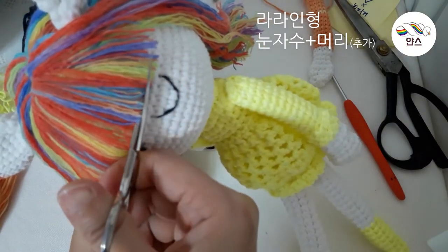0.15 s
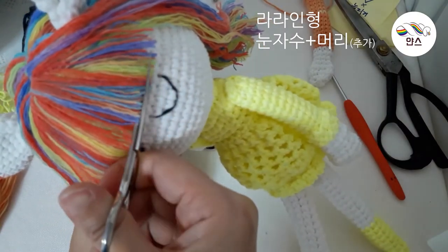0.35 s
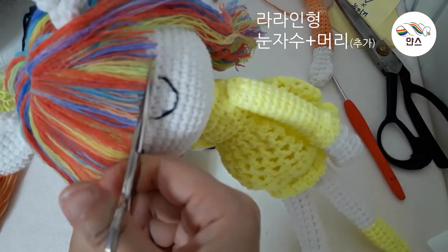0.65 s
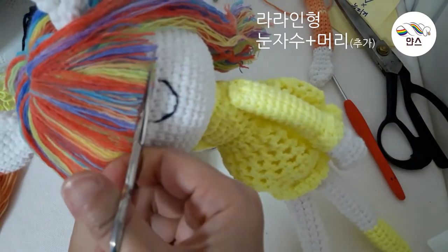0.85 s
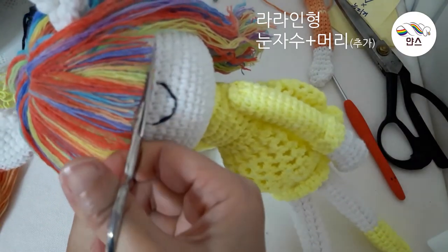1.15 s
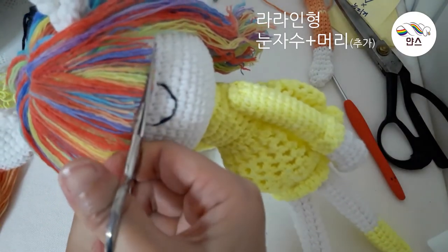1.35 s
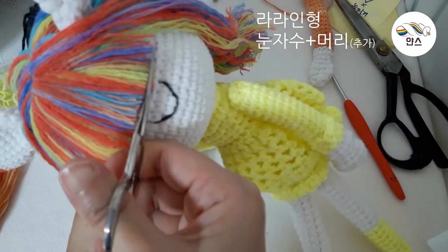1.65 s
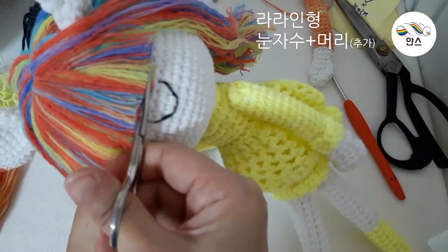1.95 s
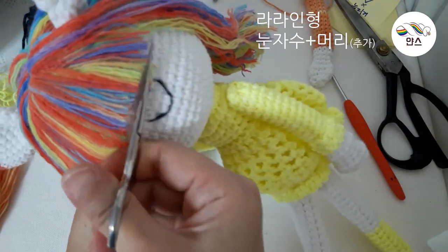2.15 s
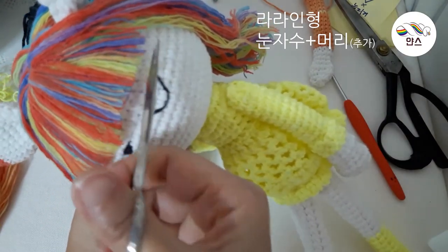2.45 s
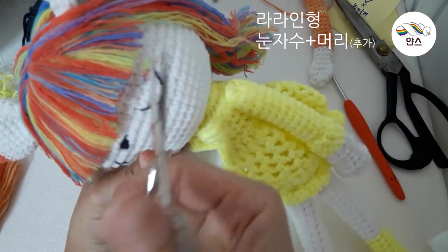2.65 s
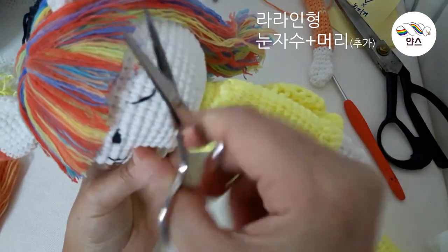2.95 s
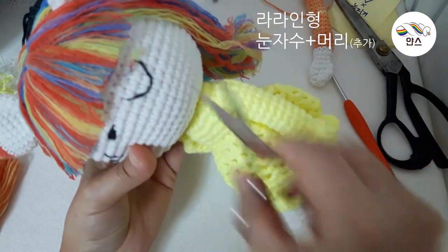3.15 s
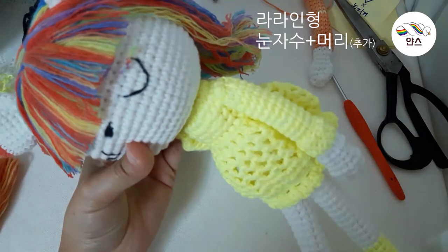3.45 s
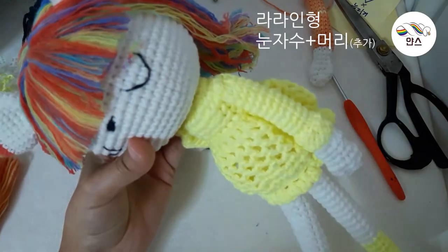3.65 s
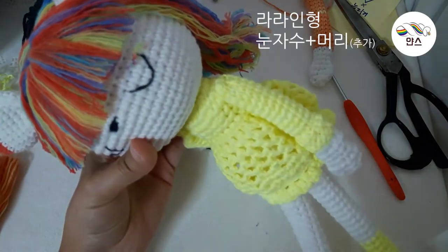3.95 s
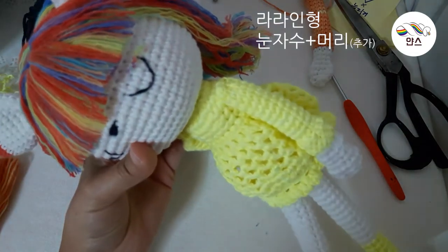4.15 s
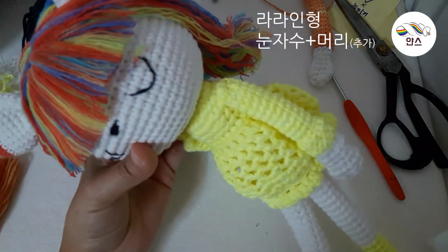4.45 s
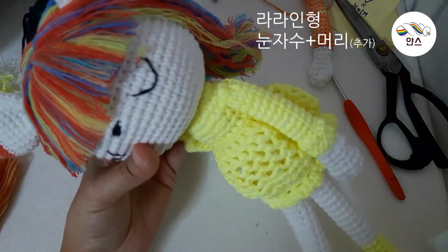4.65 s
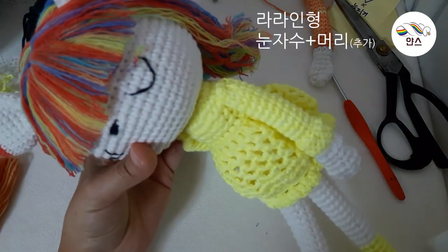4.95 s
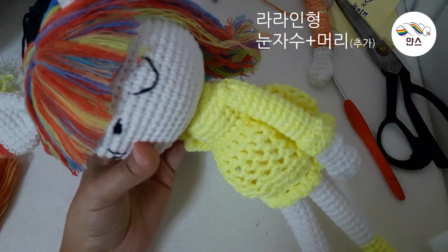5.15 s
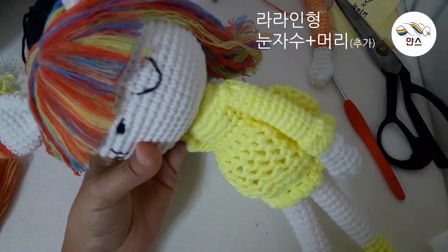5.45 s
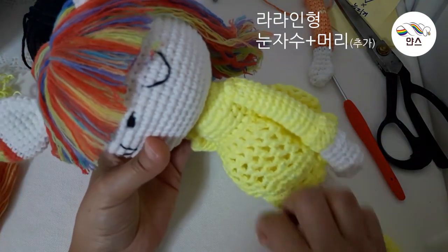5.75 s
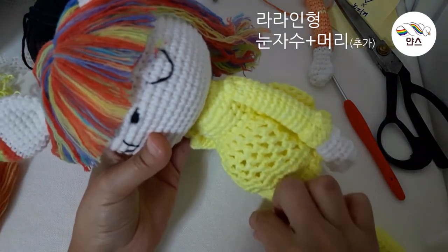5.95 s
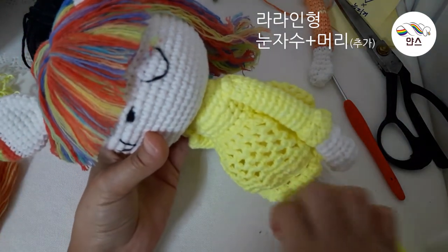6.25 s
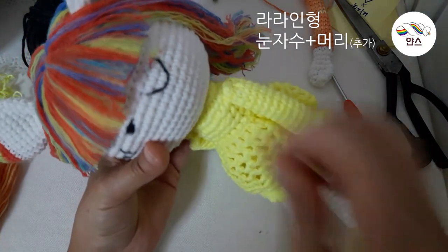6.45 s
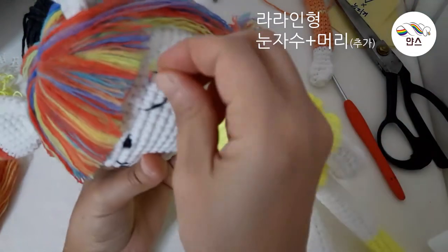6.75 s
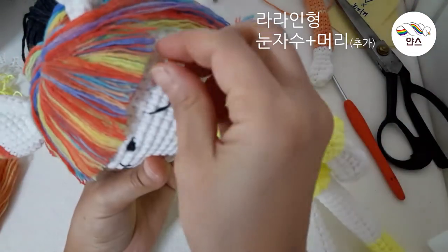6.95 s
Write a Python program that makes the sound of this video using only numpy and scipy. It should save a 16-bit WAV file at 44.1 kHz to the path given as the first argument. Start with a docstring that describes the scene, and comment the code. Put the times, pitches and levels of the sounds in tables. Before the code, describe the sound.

Two soft, crunchy scissor cuts through yarn, followed by a click, a brief steel clatter and light knocks on a table.

```python
"""Small steel scissors trim a doll's yarn fringe twice, close to the microphones in a quiet, droning room:
the blades rub, strands part in short crunches, the tips click shut. At 3.8 s the scissors are closed,
then fingers brush the doll's wool on and off. At 4.5 s the scissors touch down on a table, and a hand
bumps it. At 5.3 s they drop: the blades crack and ring, the top thuds. Near 6 s a hand taps the table
and judders along its edge."""
import sys
import numpy as np
from scipy import signal
from scipy.fft import rfft, irfft
from scipy.io import wavfile

SR = 44100
rng = np.random.default_rng(int(sys.argv[2]) if len(sys.argv) > 2 else 0)


def store_wav(level_fs):
    """Save 16-bit WAV to argv[1]."""
    pcm = np.round(np.clip(np.atleast_2d(level_fs), -1, 1) * 32767)
    wavfile.write(sys.argv[1], SR, pcm.T.astype(np.int16))


N = 313551
TIME_S = np.arange(N) / SR
AGE_S = TIME_S[:SR // 2]

# Room noise, its bass trim, its side channel. Each row: frequency in Hz, gain in dB.
AIR_COLOUR = [(15, -40), (25, -9), (59, -6.5), (107, -9), (133, -5), (160, -10.5), (188, -9), (221, -13.5),
              (433, -18.5), (631, -19), (703, -20), (1660, -24), (7300, -39), (8130, -43), (15500, -32)]
AIR_BASS_TRIM = [(30, -9.5), (45, -2), (78, -7.0), (110, -0.5)]
AIR_SIDE_COLOUR = [(30, -33.5), (70, -31), (150, -22), (300, -12.5), (700, -9), (1500, -7.5), (3000, -4.5),
                   (6000, -6), (14000, -4.5)]
# Room drones. Each row: centre in Hz, half width in Hz, level in dB.
ROOM_DRONES = [(45.9, 5.5, -71), (102.9, 4.58, -72.5), (164, 10, -74.5), (473.7, 6, -84.5)]
# Blades sliding over each other and the yarn. Each row: start in seconds, length in seconds, level in dB.
BLADE_STROKES = [(.04, 0.44, -64.5), (.84, 0.1, -77), (1.755, 0.1, -61), (2.12, 0.052, -66.5)]
# Strands parting. Each row: midpoint in seconds, level in dB.
STRAND_CUTS = [(.224, -54.5), (.291, -57), (.312, -51), (.325, -56), (.346, -51), (0.361, -48.5),
               (.371, -52), (.380, -45.5), (.414, -44), (.426, -54), (1.860, -41.5), (1.883, -43.5),
               (1.8892, -45)]
# Blades and pivot clicking, then a hand tapping the table (last two rows). Each row: start in seconds,
# snap level in dB, tilt in dB per octave, resonance in Hz, its level in dB, its t60 in seconds.
CLICKS_AND_TAPS = [(0.3088, -45, 0, 2460, -58, .01), (0.4519, -39, 2, 7700, -60, .018),
                   (.565, -57, -5, 1817, -52, 0.063), (1.9134, -31.5, -2, 2700, -36, 0.0068),
                   (3.7623, -29, 0.2, 7910, -47.5, .06), (4.9553, -49, -8.5, 4180, -54, .021),
                   (5.197, -56, -5, 3000, -71, .02), (5.2658, -52.5, -9.5, 3600, -61, 0.013),
                   (5.797, -70, -7, 1193, -54.5, 0.028), (5.957, -55, -3, 2360, -53.5, 0.016)]
# Fingers on wool. Each row: start in seconds, length in seconds, level in dB.
WOOL_BRUSHES = [(3.88, 0.075, -68), (4.085, .12, -64.5), (4.17, 0.34, -74.5), (4.835, .2, -65.5),
                (5.08, 0.49, -69.5), (5.79, 0.12, -71), (5.94, 0.24, -69.5), (6.85, 0.076, -74)]
# Steel meeting the table. Each row: start in seconds, crack in dB, ring in dB,
# time until choked in seconds, posture from 0 (on the tip) to 1 (flat).
STEEL_CONTACTS = [(4.509, -43, -44, 0.046, .25), (4.525, -38.5, -35.5, 0.06, .15),
                  (4.534, -49.5, -40, 0.031, .05), (4.561, -51, -43, 0.026, 0.34),
                  (4.6098, -51, -44, 0.05, 0.5), (5.306, -58, -48.5, 0.033, .05),
                  (5.322, -54.5, -50.5, .07, .15), (5.3766, -19, -23.5, 0.06, .92),
                  (5.390, -45.5, -49.5, .04, 0.91), (5.4045, -37, -32, .035, 0.92),
                  (5.4991, -52.5, -60, .02, .95)]
# Bending modes of the blades. Each entry: frequency in Hz.
BLADE_MODES_HZ = [1703, 3440, 5895, 6685, 7424, 8443, 8495, 9215, 9585, 9762, 10414, 10535, 11968, 12452,
                  13430, 13497, 13540, 14122, 14300, 14530, 15130]
# The same modes. Each row: t60 in seconds, weight on the tip in dB, weight lying flat in dB.
BLADE_MODE_RESPONSE = [(0.2, -11, -21.5), (.147, -12.5, -24.5), (0.19, -5, -26), (0.09, -5, -11),
                       (0.12, -37.5, -14), (0.21, -29, -6), (0.2, -5, -28), (.1, -9, -26),
                       (0.087, -21.5, 2), (0.22, 0.5, -18.5), (0.14, -6.5, -5), (0.1805, -8.5, -24),
                       (.1, -29, 1), (.12, -27, -16.5), (0.12, 0.5, 5.5), (0.13, -13, 1.5),
                       (0.1394, -6.5, -2), (.16, -5, -1), (.16, -8, -3), (.14, -7, -13.5),
                       (0.506, -38, -22.5)]
# Blows on the table. Each row: start in seconds, force in dB, push length in seconds,
# place from 0 (middle) to 1 (edge).
TABLE_BUMPS = [(4.523, -42, .0014, .2), (4.551, -46, .0023, .05), (4.856, -39, .0055, .3),
               (5.376, -33, .004, .08), (5.397, -46, .0042, .5), (6.048, -40, .00037, .95)]
# Table top modes. Each row: frequency in Hz, t60 in seconds, weight in the middle in dB, at the edge in dB.
TABLE_MODES = [(106.7, 0.27, 0, -19.5), (122, 0.26, -8.5, -23.5), (156.6, 0.23, -8.5, -5),
               (190, 0.12, -8.5, -7.5), (213, 0.12, -7.5, -9.5), (274.5, 0.1, -9, -6),
               (341.3, 0.085, -0.5, -12.5), (450, 0.066, -15, -10.5), (785, 0.022, -16, -6.5),
               (998, 0.0242, -14.5, -9), (1139, 0.0324, -18, -7)]
# Spectra of edges rubbing, yarn parting, clicks and taps, brushed wool, steel impacts and the reverb's
# side channel. Each row: frequency in Hz, gain in dB.
RUB_COLOUR = [(500, -29), (1200, 0), (2300, 8.5), (3050, -4), (3650, -0.5), (4700, 1), (5800, -5.5),
              (7600, 2.5), (8800, -12), (9900, -3.5), (11000, -11), (12200, -7), (13200, -14),
              (16000, -21.5)]
FIBRE_COLOUR = [(400, -30), (1000, -13.5), (1700, 3), (2500, 2.5), (3100, -14), (3700, -2), (4700, -1.5),
                (6700, -12), (7600, -5.5), (8300, -12), (9800, -6.5), (11000, -14.5), (12200, -6.5),
                (13000, -8), (13800, -10), (16000, -3)]
SNAP_COLOUR = [(500, -32), (1500, -14), (2650, 4), (3600, -5), (4500, -0.5), (6000, -14), (7800, -4.5),
               (10000, -0.5), (11700, -4), (13400, -1.5), (16000, 4)]
BRUSH_COLOUR = [(300, -3), (1000, -1.5), (2000, -3.5), (3800, 1), (5500, -9.5), (7500, -5.5), (9000, -15),
                (13000, -8.5), (16000, -27)]
IMPACT_COLOUR = [(40, -38), (130, -4), (300, -3.5), (620, -1), (1200, -1), (1900, -6), (2500, -0.5),
                 (3400, -4), (4000, -7), (4700, -4), (7100, 2.5), (8800, -16), (10000, -5.5), (12000, 5),
                 (13600, -3), (14900, -5), (16000, -13)]
REVERB_SIDE_COLOUR = [(300, -23.0), (2000, 21.5), (5000, -20.0), (14000, -23.5)]


def undb(db):
    """Decibels to gain."""
    return 10 ** (np.asarray(db) / 20)


def unit(x):
    """Scale to rms 1."""
    return x / np.sqrt(np.mean(x ** 2))


def fade(t60_s):
    """Free decay after a blow."""
    return np.exp(-np.log(1000) * AGE_S / t60_s)


def add(track, start_s, sound):
    """Mix a sound into the track."""
    start = int(start_s * SR)
    track[start:start + len(sound)] += sound[:N - start]


def gains(points, hz):
    """Gain of a (Hz, dB) colour at given frequencies."""
    point_hz, db = np.transpose(points)
    return undb(np.interp(np.log(hz + 1), np.log(point_hz), db))


def colour(x, points, tilt_db_oct=0):
    """Minimum-phase filter that keeps the power of white noise."""
    hz = np.fft.rfftfreq(1024, 1 / SR)
    tilt = undb(tilt_db_oct * np.log2(hz / 5000 + 0.1))
    cepstrum = irfft(np.log(gains(points, hz) * tilt))
    cepstrum[1:len(hz) - 1] *= 2
    cepstrum[len(hz):] = 0
    response = irfft(np.exp(rfft(cepstrum)))
    return signal.fftconvolve(x, response / np.linalg.norm(response))[:len(x)]


def band(centre_hz, half_width_hz, size=N):
    """Noise in one resonance, rms 1; a random wander if centred on 0 Hz."""
    hz = np.fft.rfftfreq(size, 1 / SR)
    spectrum = rfft(rng.standard_normal(size)) / (1 + ((hz - centre_hz) / half_width_hz) ** 2)
    return unit(irfft(spectrum, size))


def crackle(rate_hz, spread_db, size=N):
    """Tiny slips and snaps of uneven size, rms 1."""
    hits = rng.random(size) < rate_hz / SR
    signs = rng.choice([-1, 1], size)
    return unit(hits * signs * undb(spread_db * np.clip(rng.standard_normal(size), -2, 2)))


def ring(modes, place, scatter_db):
    """Modes of a struck body; the place of the blow, 0 to 1, shares out the energy."""
    hz, t60_s, here_db, there_db = np.transpose(modes)
    detune, uneven = rng.standard_normal((2, len(hz)))
    weights = undb(here_db + place * (there_db - here_db) + scatter_db * uneven)
    weights *= np.sqrt(2) / np.linalg.norm(weights)
    hz = hz * (1 + .001 * detune)
    return sum(w * fade(t) * np.sin(2 * np.pi * f * AGE_S) for f, t, w in zip(hz, t60_s, weights))


def arch(start_s, length_s, crest):
    """Smooth rise and fall, reaching 1 at the fraction `crest` of its length."""
    progress = (TIME_S - start_s) / length_s
    return np.sin(np.pi * np.interp(progress, [0, crest, 1], [0, .5, 1]))


def pressure(moves, crest):
    """Envelope of a series of movements, one arch each."""
    return sum(undb(db) * arch(start_s, length_s, crest) for start_s, length_s, db in moves)


def air(noise_db=-64.5, deep_hz=69, deep_db=-77, swell_db=-66.5):
    """Room rumble, microphone hiss and wavering drones; one deep drone swells once."""
    hz = np.fft.rfftfreq(N, 1 / SR)
    mid, side = rfft(rng.standard_normal((2, N))) * gains(AIR_COLOUR, hz) * gains(AIR_BASS_TRIM, hz)
    mid, side = irfft(mid, N), irfft(side * gains(AIR_SIDE_COLOUR, hz), N)
    noise = undb(noise_db) * (mid + np.outer([1, -1], side)) / mid.std()
    drones = sum(undb(db) * band(centre_hz, half_hz) for centre_hz, half_hz, db in ROOM_DRONES)
    deep = unit(np.sin(2 * np.pi * deep_hz * TIME_S + band(0, half_width_hz=3)))
    swell = undb(swell_db) * arch(start_s=2.45, length_s=.5, crest=0.43)
    return noise + drones + deep * (undb(deep_db) + swell)


def snips(lead_s=0.05):
    """The edges rub in fine stick-slip; each strand parts as a swell of snapping fibres."""
    slips = crackle(rate_hz=5500, spread_db=6)
    flicker_db = 3.4 * band(0, half_width_hz=53)
    out = colour(slips * undb(flicker_db), RUB_COLOUR) * pressure(BLADE_STROKES, crest=0.45)
    for middle_s, db in STRAND_CUTS:
        sigma_s = 0.0031 * 2 ** ((db + 45) / 10)  # thicker bunches are louder and take longer
        swell = np.exp(-.5 * ((AGE_S - lead_s) / sigma_s) ** 2)
        fibres = swell * crackle(rate_hz=9000, spread_db=5, size=len(AGE_S))
        add(out, middle_s - lead_s, undb(db) * colour(fibres, FIBRE_COLOUR, tilt_db_oct=0.5))
    return out


def clicks_and_taps():
    """Blades and pivot click, then a hand taps the table; each is a snap and one brief resonance."""
    out = np.zeros(N)
    for start_s, snap_db, tilt_db_oct, hz, ring_db, t60_s in CLICKS_AND_TAPS:
        burst = fade(t60_s=0.0057) * rng.standard_normal(len(AGE_S))
        snap = undb(snap_db) * colour(burst, SNAP_COLOUR, tilt_db_oct)
        resonance = undb(ring_db) * fade(t60_s) * band(hz, 0.044 * hz, size=len(AGE_S))
        add(out, start_s, snap + resonance)
    return out


def wool():
    """Fibres catch and let go under the fingers."""
    catches = crackle(rate_hz=4900, spread_db=4.5)
    flicker_db = 1.8 * band(0, half_width_hz=40)
    return colour(catches * undb(flicker_db), BRUSH_COLOUR) * pressure(WOOL_BRUSHES, crest=.22)


def blade_impact(t60_s, tilt_db_oct):
    """One blade lands in a dense, decaying chatter."""
    chatter = fade(t60_s) * crackle(rate_hz=13000, spread_db=1.0, size=len(AGE_S))
    return colour(chatter, IMPACT_COLOUR, tilt_db_oct)


def dropped_steel(second_lag_s=.003, second_db=-5):
    """The two blades land in turn, brighter the harder they hit, and ring until they come to rest."""
    out = np.zeros(N)
    modes = np.column_stack([BLADE_MODES_HZ, BLADE_MODE_RESPONSE])
    for start_s, crack_db, ring_db, rest_s, flat in STEEL_CONTACTS:
        tilt_db_oct = 0.17 * (crack_db + 22.5)
        first = blade_impact(t60_s=0.02, tilt_db_oct=tilt_db_oct)
        second = blade_impact(t60_s=0.039, tilt_db_oct=tilt_db_oct)
        add(out, start_s, undb(crack_db) * first)
        add(out, start_s + second_lag_s, undb(crack_db + second_db) * second)
        blades = ring(modes, flat, scatter_db=3.0) * (1 - fade(t60_s=0.0076))
        pivot_rattle = unit(undb(2.4 * band(0, half_width_hz=119.5, size=len(AGE_S))))
        choke = undb(-27) + np.exp(-(AGE_S / rest_s) ** 4)  # table and fingers leave a faint after-ring
        add(out, start_s, undb(ring_db) * blades * pivot_rattle * choke)
    return out


def table_thuds(blows):
    """A longer, softer push reaches only the lowest modes of the top, which radiates little below them."""
    out = np.zeros(N)
    for start_s, db, push_s, edge in blows:
        push = np.sin(np.pi * np.minimum(AGE_S / push_s, 1))
        thud = signal.fftconvolve(ring(TABLE_MODES, edge, scatter_db=2), push / push.sum())
        add(out, start_s, undb(db) * thud[:len(AGE_S)])
    return signal.sosfilt(signal.butter(6, 84, "high", fs=SR, output="sos"), out)


def judder(count=5, start_s=5.957, gap_s=.0165, push_s=0.0022, first_db=-52, growth_db=3.1):
    """Blows of a hand slipping almost evenly along the table's edge, pressing harder as it goes."""
    gaps_s = gap_s * (1 + 0.14 * rng.standard_normal(count))
    return [(start_s + gaps_s[:k].sum(), first_db + k * growth_db, push_s, 1) for k in range(count)]


def room(x, wet_db, low_t60_s, high_t60_s, width):
    """A small furnished room swallows the treble first; the two close microphones differ only a little."""
    echoes = rng.standard_normal((2, len(AGE_S)))
    lows = signal.sosfilt(signal.butter(1, 3000, fs=SR, output="sos"), echoes)
    tails = lows * fade(low_t60_s) + (echoes - lows) * fade(high_t60_s)
    mid, side = tails * (1 - fade(t60_s=0.044))
    side = colour(side, REVERB_SIDE_COLOUR)
    mid, side = (signal.fftconvolve(x, tail / np.linalg.norm(tail))[:N] for tail in (mid, side))
    return undb(wet_db) * (mid + width * np.outer([1, -1], side))


def scene():
    """Close sounds at the table, their reverb and the room's air."""
    near = snips() + clicks_and_taps() + dropped_steel() + table_thuds(TABLE_BUMPS + judder()) + wool()
    return near + room(near, wet_db=-18.5, low_t60_s=0.36, high_t60_s=0.14, width=0.21) + air()


def record(dry):
    """Band limit: 38 Hz to 15.8 kHz."""
    dry = signal.sosfilt(signal.butter(10, 38, "high", fs=SR, output="sos"), dry)
    return signal.sosfilt(signal.ellip(10, .2, 70, 15800, fs=SR, output="sos"), dry)


dry = scene()
out = record(dry)
store_wav(out)
```